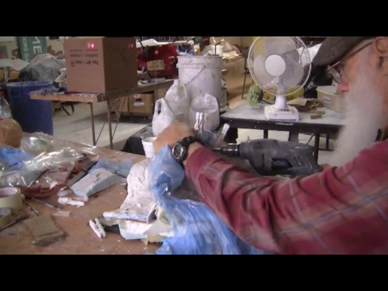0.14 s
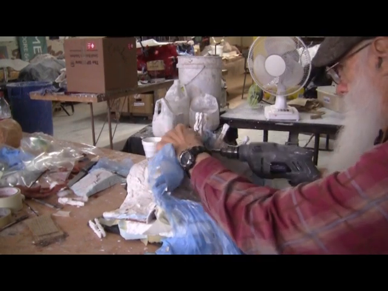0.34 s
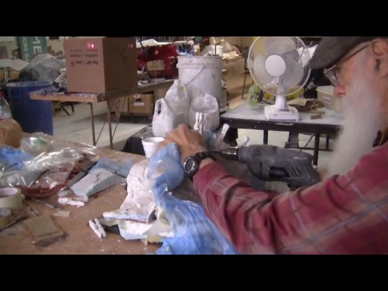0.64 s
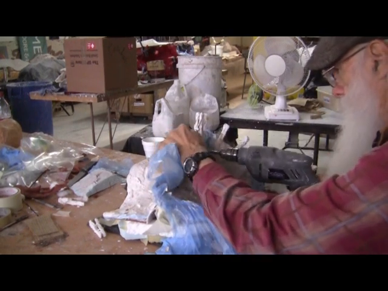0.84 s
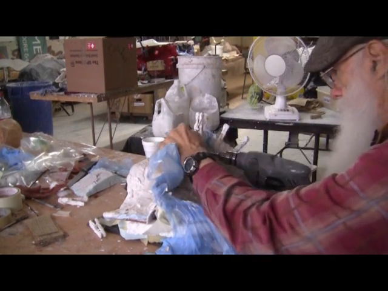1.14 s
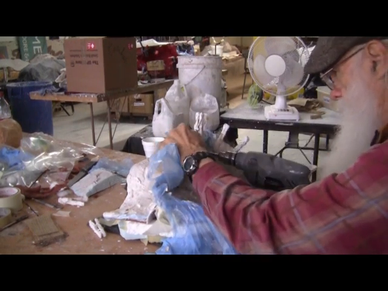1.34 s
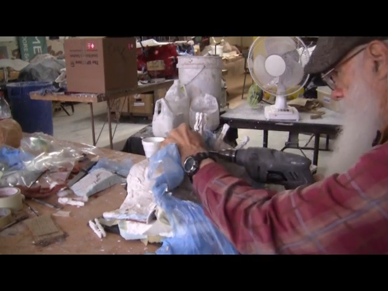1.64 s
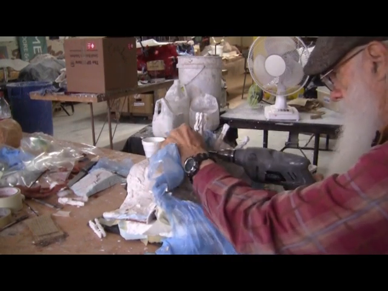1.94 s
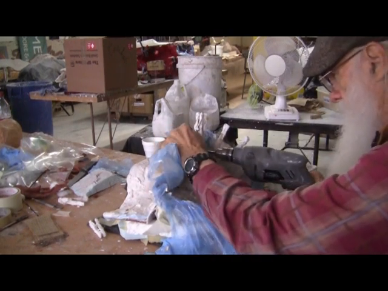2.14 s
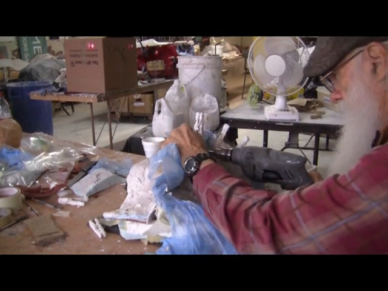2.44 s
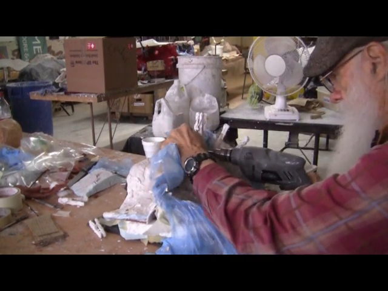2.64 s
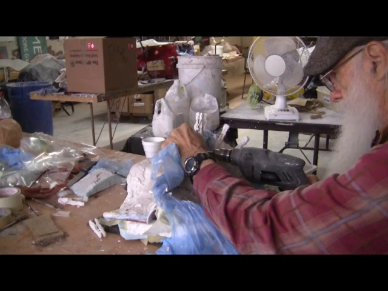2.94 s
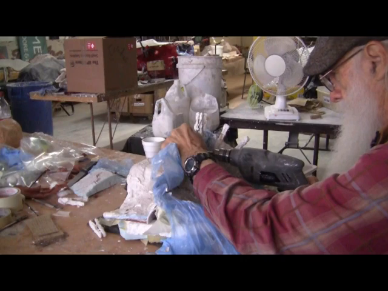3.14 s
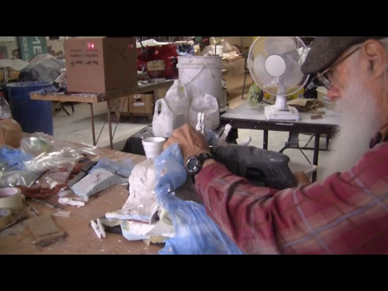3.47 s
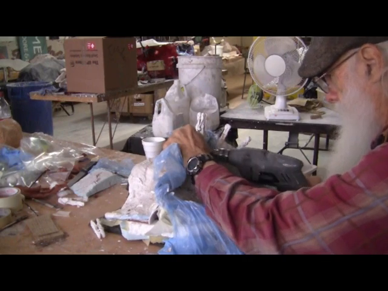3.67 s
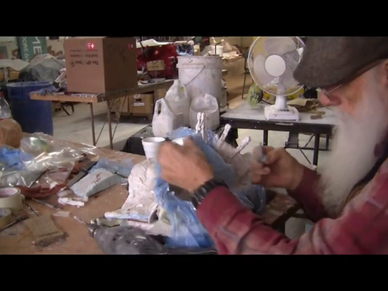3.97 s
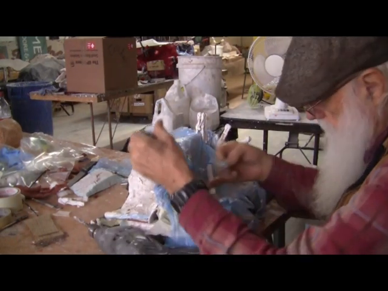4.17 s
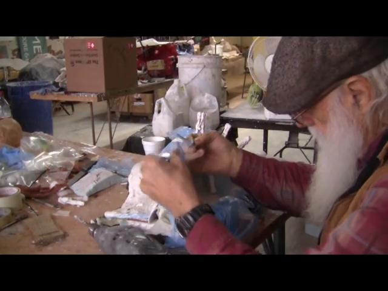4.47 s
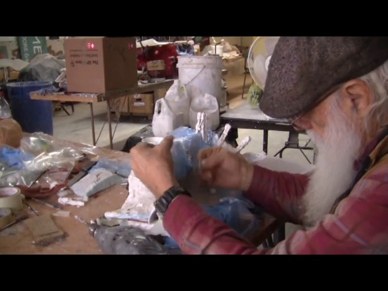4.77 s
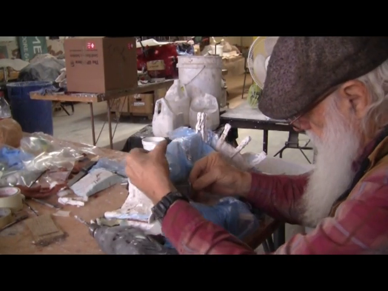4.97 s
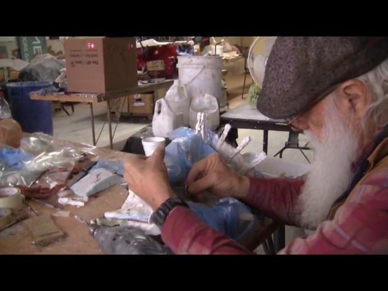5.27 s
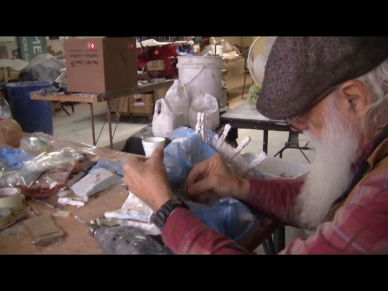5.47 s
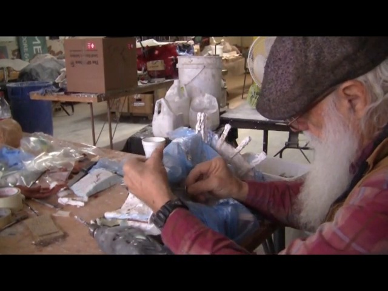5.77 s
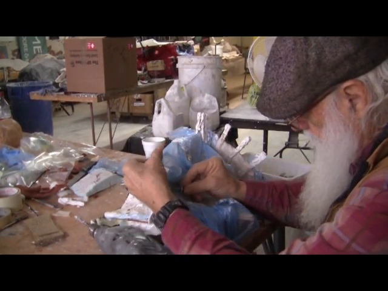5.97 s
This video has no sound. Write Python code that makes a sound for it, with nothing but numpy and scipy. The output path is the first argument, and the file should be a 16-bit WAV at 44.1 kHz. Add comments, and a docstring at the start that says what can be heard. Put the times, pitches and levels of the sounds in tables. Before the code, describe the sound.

Close plastic crinkling and small clicks surround one loud, whining, clattering run of an electric drill that stops suddenly.

```python
"""Plastic sheet and drill at a workshop bench

Close to a stereo microphone a hand rustles thin plastic; then an electric drill spins up and bores into
a mould. Its reduction gear whines and throbs once a chuck turn, the teeth clatter in the housing, the
cooling fan hisses, and a limiter holds it all down. A hard cut leads to a second scene: louder room air,
more plastic, small clicks."""
import sys
import numpy as np
from scipy import signal
from scipy.fft import rfft, irfft
from scipy.io import wavfile
from scipy.ndimage import uniform_filter1d

SR = 44100
rng = np.random.default_rng(int(sys.argv[2]) if len(sys.argv) > 2 else 0)


def digitize_waveform(pressure):
    """Quantize a signal to 16-bit integers and store it at the path in sys.argv[1].

    Rows of a 2-D input are taken as channels; values are limited to [-1, 1].
    """
    field = np.atleast_2d(pressure).T
    bounded = np.clip(field, -1, 1)
    quanta = np.round(bounded * 32767).astype(np.int16)
    wavfile.write(sys.argv[1], SR, quanta)


N = 269451
T = np.arange(N) / SR
HZ = np.fft.rfftfreq(N, 1 / SR)
TRIGGER_S, CUT_S = 1.24, 3.7745
PINION_TEETH, GEAR_TEETH, WHISTLE_ORDER = 5, 46, 35


def amp(db):
    """Decibels to gain."""
    return 10 ** (np.asarray(db) / 20)


def unit(x):
    """Scales to rms 1."""
    return x / np.sqrt(np.mean(x ** 2) + 1e-20)


def curve_at(points, hz, resonances=()):
    """Reads a curve on a log-frequency axis, plus bell-shaped resonances."""
    freqs, values = np.transpose(points)
    bells = sum(db * np.exp(-((hz - centre) / width) ** 2) for centre, width, db in resonances)
    return np.interp(np.log(hz + 1), np.log(freqs + 1), values) + bells


def colour(x, spectrum, resonances=()):
    """Causal filter with the given spectrum: a click rings after it lands."""
    hz = abs(np.fft.fftfreq(8192, 1 / SR))
    log_gain = np.log(amp(curve_at(spectrum, hz, resonances)))
    taps = np.fft.ifft(np.exp(np.conj(signal.hilbert(log_gain)))).real
    return signal.oaconvolve(x, taps[:len(taps) // 2])[:N]


def drift(rate_hz):
    """Random wander of rms 1, mostly slower than rate_hz."""
    return unit(irfft(rfft(rng.standard_normal(N)) / (1 + (HZ / rate_hz) ** 4), N))


def steady(x, size=2001):
    """Takes the slow level out of x, leaving its grain."""
    return x / np.sqrt(abs(uniform_filter1d(x ** 2, size)) + 1e-5 * np.mean(x ** 2))


# Room tone of the workshop in each scene: (frequency [Hz], relative level [dB])
FIRST_ROOM_TONE = [(20, -15), (55, -14.5), (120, -11), (215, -7.5), (350, -13), (480, -16), (1300, -21),
                   (1800, -23), (2300, -28), (3200, -28.5), (6500, -34), (9500, -40), (15500, -44)]
SECOND_ROOM_TONE = [(15, -50), (25, -32), (107, -9), (209, -7), (253, -1), (598, -8.5), (804, -11),
                    (1140, -19), (1450, -20.5), (1570, -20.5), (2420, -25.5), (3830, -37), (7500, -42.5),
                    (11200, -47), (15500, -48)]
# Ventilation resonances and one dip: (frequency [Hz], width [Hz], gain [dB])
DUCT_RESONANCES = [(55.6, 5.8, 3.5), (108, 7, 5), (252, 12, 1.5), (597, 126, -3.5), (641, 20, 6.5),
                   (825, 13, 3.5), (1436, 37, 8.5)]
# How alike the room tone is at the two microphone ports: (frequency [Hz], coherence [0..1])
ROOM_COHERENCE = [(60, 0.88), (300, 0.83), (700, 0.65), (1400, 0.74), (6000, 0.22), (15000, 0.14)]

def room_air(spectrum, db):
    """Ventilation rumbles all round the microphone, partly alike at its two ports."""
    left, independent = rfft(rng.standard_normal((2, N)))
    coherence = np.clip(curve_at(ROOM_COHERENCE, HZ), 0, 1)
    right = coherence * left + np.sqrt(1 - coherence ** 2) * independent
    rumble = irfft(np.array([left, right]) * amp(curve_at(spectrum, HZ, DUCT_RESONANCES)), N)
    flutter = amp(.7 * drift(12))
    return amp(db) * unit(rumble) * flutter


def chirr(hz=1790, pulses_per_s=23, db=-53):
    """A faint, quickly pulsing squeak somewhere in the shop."""
    pulses = np.exp(2.1 * np.cos(2 * np.pi * pulses_per_s * T + 0.48 * drift(3)))
    squeak = np.cos(2 * np.pi * hz * T + 2.2 * drift(120))
    return amp(db) * unit(pulses * squeak)


# Strokes of the hand on the plastic: (peak time [s], level [dB], rise [s], fade [s])
HAND_STROKES = [(0.055, -37.5, 0.054, 0.07), (0.19, -38, 0.1, 0.096), (0.396, -29, 0.044, 0.082),
                (0.616, -33, 0.051, 0.13), (0.94, -45, 0.046, 0.032), (1.2, -41.5, 0.066, 0.071),
                (4.013, -34, 0.015, 0.11), (4.07, -25.5, 0.0082, 0.032), (4.445, -28.5, 0.013, 0.034),
                (4.492, -31, 0.016, 0.012), (4.528, -30, 0.011, 0.041), (4.68, -36, 0.14, 0.2),
                (4.84, -40.5, 0.1, 0.058), (5.08, -45, 0.11, 0.21), (5.66, -42.5, 0.1, 0.03),
                (5.83, -43.5, 0.013, 0.011), (6.09, -45.5, 0.14, 0.07)]
# The sheet crumpled and lightly brushed: (frequency [Hz], relative level [dB])
CRUMPLE_SPECTRUM = [(100, -53), (400, -3.5), (900, 4), (1600, 0), (3000, 0), (4500, -1), (5500, -4.5),
                    (8000, -2.5), (9800, 0.5), (11300, -12), (15500, -22)]
BRUSH_SPECTRUM = [(100, -22), (500, 16), (1500, -10), (3000, 1.5), (5500, -4.5), (7500, -2), (9700, 1.5),
                  (11300, -14), (15500, -21)]

def plastic(snaps_per_s=900, spread_db=3.5, slide=0.91, resting_db=-53.5):
    """Plastic on the bench: tiny buckling snaps over a sliding hiss, swelling with each stroke."""
    power = amp(resting_db) ** 2  # the sheet never quite rests under the hand
    for peak_s, db, rise_s, fade_s in HAND_STROKES:
        stroke = np.exp(-np.maximum((peak_s - T) / rise_s, (T - peak_s) / fade_s))
        power = power + (amp(db) * stroke) ** 2
    level_db = 10 * np.log10(power)
    snaps = (rng.random(N) < snaps_per_s / SR) * rng.choice([-1, 1], N)
    sizes = amp(spread_db * np.minimum(rng.exponential(1, N), 4))
    grain = unit(steady(snaps * sizes, size=1501) + slide * rng.standard_normal(N))
    crumpled = amp(2.5) * unit(colour(grain, CRUMPLE_SPECTRUM))
    brushed = amp(-.5) * unit(colour(grain, BRUSH_SPECTRUM))
    firmness = np.clip((level_db + 50.5) / 16, 0, 1)
    drill_off = (T < TRIGGER_S) | (T > CUT_S)
    return (firmness * crumpled + (1 - firmness) * brushed) * amp(level_db) * drill_off


# Snaps of the sheet, the trigger and small parts at the bench:
# (time [s], peak level [dB], low tilt [dB], high tilt [dB], crack decay [s])
BENCH_CLICKS = [(0.153, -18, -5, -15, 0.0011), (0.191, -13, -4, -12, 0.0015),
                (0.366, -17.5, -7, -30, 0.0011), (0.396, -13.5, -17, -4, 0.00081),
                (0.671, -22, 7, -18, 0.00089), (0.761, -21, -10, -11, 0.001),
                (0.855, -27, -15, -6, 0.00085), (0.901, -26.5, -16, -19, 0.001),
                (1.176, -26, -19, -24, 0.001), (1.24, -21, -18, -1, 0.00083), (1.308, -3, -10, -30, 0.0012),
                (4.024, -18, -32, -5, 0.001), (4.354, -12.5, -15, -13.5, 0.001),
                (4.464, -16.5, -25, 5, 0.0011), (4.526, -15, -18, -6, 0.002), (4.676, -21, 3, -9, 0.00097),
                (5.459, -20.5, -7, -47, 0.001), (5.665, -24, 0, -33, 0.0011)]
# Body of a click: (frequency [Hz], relative level [dB])
CLICK_SPECTRUM = [(100, -17), (500, -5.5), (1100, 5.5), (2000, 4.5), (3300, -6), (5500, -2), (9800, 6.5),
                  (11500, -28), (16000, -37)]
# Resonances and one dip of a clicked part: (frequency [Hz], width [Hz], gain [dB])
CLICK_RESONANCES = [(1110, 140, 1), (1900, 930, -3.5), (3360, 180, 8), (4630, 250, 7)]

def clicks(ring=0.39, ring_t60_s=0.11):
    """Each click is a sharp crack and a short dead ring, tilted dull or bright."""
    out = np.zeros(N + SR)
    t = np.arange(4096) / SR
    hz = np.fft.rfftfreq(len(t), 1 / SR)
    body_db = curve_at(CLICK_SPECTRUM, hz, CLICK_RESONANCES)
    for start_s, db, low_db, high_db, crack_s in BENCH_CLICKS:
        envelope = np.exp(-t / crack_s) + ring * amp(-60 * t / ring_t60_s)
        burst = rng.standard_normal(len(t)) * envelope
        tilt_db = curve_at([(1200, low_db + 7.5), (3500, 0), (7500, high_db)], hz)
        click = irfft(rfft(burst) * amp(body_db + tilt_db - 2))
        out[round(start_s * SR):][:len(t)] += amp(db) * click / abs(click).max()
    return out[:N]


# The motor's frame: (frequency [Hz], relative level [dB])
FRAME_SPECTRUM = [(100, -20), (350, -12), (580, 0), (950, 0.5), (1400, -14.5), (3000, -6.5), (8000, -65)]

def growl(db=-22, buzz_hz=120, rise_s=0.025, fade_s=0.25):
    """The starting current shakes the frame twice a mains cycle and dies as the motor gathers speed."""
    age = np.maximum(T - TRIGGER_S, 0)
    pulses = np.exp(0.38 * np.cos(2 * np.pi * buzz_hz * age)) * rng.standard_normal(N)
    envelope = np.minimum(age / rise_s, 1) * np.exp(-age / fade_s)
    return amp(db) * envelope * steady(colour(pulses, FRAME_SPECTRUM))


# Air through the drill's vents: (frequency [Hz], relative level [dB])
VENT_SPECTRUM = [(200, -38), (1000, -2.5), (4500, -3), (5600, -5.5), (7400, -3), (8800, 3.5), (9900, 0.5),
                 (10800, -11.5), (13000, -12), (16000, -51)]

def fan(chuck):
    """Cooling air rushes through the vents."""
    return unit(colour(rng.standard_normal(N), VENT_SPECTRUM)) * np.exp(0.049 * np.cos(chuck))


# The high whistle as it climbs: (frequency [Hz], level [dB])
MOTOR_WHISTLE = [(6600, -60), (7700, -23), (8700, -19), (10000, -25), (13000, -37), (14700, -27),
                 (15400, -40.5)]

def whistle(speed, turns, waver_db=-2.0):
    """A thin, wavering high whistle that climbs at 35 times the motor's speed."""
    tone = np.cos(2 * np.pi * WHISTLE_ORDER * turns + .4 * drift(120))
    return amp(curve_at(MOTOR_WHISTLE, WHISTLE_ORDER * speed) + waver_db * drift(5.5)) * tone


# Body of the mould under the bit: (frequency [Hz], relative level [dB])
MOULD_SPECTRUM = [(50, -21), (110, -20), (270, -23.5), (470, 3.5), (750, -2), (1300, 5), (1900, -4.5),
                  (3500, -8), (6000, -17), (15000, -45)]

def boring(chuck, chips_per_s=2500, throb=0.053):
    """Chips break off under the turning bit and sound through the mould."""
    chips = (rng.random(N) < chips_per_s / SR) * rng.standard_normal(N)
    return steady(colour(chips * np.exp(throb * np.cos(chuck)), MOULD_SPECTRUM))


# The gear wheel slapping across its play: (frequency [Hz], relative level [dB])
SLAP_SPECTRUM = [(300, -34.5), (1200, -12.5), (2200, -15.5), (2900, -3.5), (3800, 1.5), (4200, -11),
                 (6000, -18), (9000, -13), (15000, -50)]
# Ring of the slapped wheel: (frequency [Hz], width [Hz], gain [dB])
WHEEL_RESONANCES = [(3470, 28, 6), (3734, 27, 4), (3840, 22, 4.5)]

def slap(chuck, strain, lag_rad=1.1, smear=0.85, chance=0.81, steps=900):
    """Once a chuck turn the gear drops into its play and chatters; strained, it grinds all the way round."""
    position = (chuck / (2 * np.pi) * steps).astype(int) % steps
    roughness = rng.standard_normal(steps)[position]  # alike on every turn
    chatter = roughness + chance * rng.standard_normal(N)
    sharpness = 2.5 * (1 - smear * strain)
    burst = np.exp(sharpness * np.cos(chuck - lag_rad))
    burst /= np.sqrt(np.i0(2 * sharpness))  # the same power at any sharpness
    return unit(colour(chatter * burst * (T > TRIGGER_S), SLAP_SPECTRUM, WHEEL_RESONANCES))


# The drill's housing, which colours clatter and whine: (frequency [Hz], relative level [dB])
HOUSING_SPECTRUM = [(60, -68), (160, -36), (280, -1), (480, -6.5), (750, -9), (1150, 5.5), (1800, -2.5),
                    (2500, -1), (4700, 6), (5500, -13), (7400, -13.5), (9500, -7.5), (11000, -11),
                    (15000, -50)]
# Its resonances and one notch: (frequency [Hz], width [Hz], gain [dB])
HOUSING_RESONANCES = [(2210, 460, 7.5), (3410, 450, 5), (3940, 36, 8), (3967, 91, -14.5), (5120, 45, 10.5),
                      (6396, 310, 13.5), (8600, 320, 4.5)]

def clatter(turns, chuck, wear=0.89, throb=0.063, lag_rad=1.0, rattle_db=2.0):
    """Teeth knock in the housing; each one's flaw returns every chuck turn, and backlash adds chance."""
    tooth = np.floor(PINION_TEETH * turns).astype(int)
    contacts = np.flatnonzero(np.diff(tooth))
    flaws = wear * unit(rng.standard_normal(GEAR_TEETH))
    knocks = np.zeros(N)
    knocks[contacts] = flaws[tooth[contacts] % GEAR_TEETH]
    backlash = rng.random(N) < np.gradient(PINION_TEETH * turns)
    knocks += backlash * rng.standard_normal(N) * amp(rattle_db * (drift(110) + 2.5))
    swell = np.exp(throb * np.cos(chuck - lag_rad))
    return steady(colour(knocks * swell, HOUSING_SPECTRUM, HOUSING_RESONANCES))


# Motor and gear-mesh partials:
# (order [x motor speed], relative level [dB], throb depth [factor], phase swing [rad])
WHINE_PARTIALS = [(1, -7, 0.15, .05), (2, -10, 0.11, 0.13), (3, -40, 0.18, 0.34), (4, -12.5, 0.14, 0.43),
                  (5, 0, 0.64, 0.77), (6, -8, 0.78, 0.25), (8, -16, 0.6, 0.85), (9, -4.5, 0.44, 2.6),
                  (10, 3, 0.67, 1.08), (11, -8.5, 0.12, 0.6), (13, -32, 0.17, .1), (14, -6.5, 0.3, .3),
                  (15, -4, 0.34, 0.8), (16, -7, 0.17, .1), (20, -1, 0.23, 1.6), (22, -3.5, 0.31, 0.44)]

def whine(speed, turns, chuck, rasp_rad=1.28, flutter_db=1.3, run_up_flutter_db=4.5):
    """Partials climb through the housing's resonances; the off-centre gear sways them once a chuck turn."""
    out = np.zeros(N)
    wobble = chuck + .14 * drift(15)
    lopsided = np.cos(wobble) - 0.4 * np.sin(2 * wobble)
    pace = speed / speed.max()
    bounce_rad = rasp_rad * np.sqrt(np.clip(1 - pace, 0, 1)) + 0.069  # teeth bounce until up to speed
    for order, db, throb, swing_rad in WHINE_PARTIALS:
        gain = amp(db + curve_at(HOUSING_SPECTRUM, order * speed, HOUSING_RESONANCES))
        if order > 10:  # the top needs speed
            gain *= pace ** 0.97
        swell = unit(np.exp(throb * pace ** 3 * lopsided))
        flutter = amp((flutter_db + run_up_flutter_db * (1 - pace)) * drift(114))
        phase = 2 * np.pi * (order * turns + rng.random())
        sway = swing_rad * np.sin(wobble) + bounce_rad * drift(150)
        out += gain * swell * flutter * np.cos(phase + sway)
    singing = np.clip((speed - 140) / 30, 0, 1)  # below 140 turns a second the gear only knocks
    return singing * out / out[(T > TRIGGER_S) & (T < CUT_S)].std()


# The load bends the motor's speed; it races as the bit breaks through: (time [s], speed gained [turns/s])
SPEED_BEND = [(1.75, -1), (2.08, 3.4), (2.22, 1.3), (2.4, 2.7), (2.7, -1), (3.05, 1.5), (3.5, -3.4),
              (3.7, 8.5), (3.77, 11)]
# How hard the bit is fed into the mould: (time [s], level [dB])
BIT_FEED = [(2.15, -12.5), (2.4, 3.5), (2.65, -3), (3.1, 4), (3.47, 1), (3.56, 7), (3.77, 9.5)]
# The bit catches while breaking through: (time [s], half length [s], whine gain [dB], scrape gain [dB])
BIT_CATCHES = [(3.515, 0.016, -7, 1), (3.642, 0.043, -10, 4.5), (3.77, 0.031, -14, 4)]
# Each layer: (base level [dB], per tenfold speed [dB], at full strain [dB], share of the feed [factor])
WHINE_LAW = (-8, 12, 7, 0.55)
CLATTER_LAW = (-17, 11, 14, 0.95)
SLAP_LAW = (-18, 7, 4.5, 0)
FAN_LAW = (-20, 34, 12, 0.97)
BIT_LAW = (-21, 14, 16.5, 1.09)

def drill(working_hz=438.5, spin_up_s=0.228, slack_db=-19, engage_s=1.285, engage_rise_s=0.042):
    """The drill, close up: one shaft spins up, and its speed, strain and feed set the layers' levels."""
    running = T > TRIGGER_S
    shortfall = np.exp(-np.maximum(T - TRIGGER_S, 0) / spin_up_s)
    bend = np.interp(T, *np.transpose(SPEED_BEND))
    speed = running * np.maximum(working_hz * (1 - shortfall) + bend, 1)  # turns a second
    speed *= 1 + .0008 * drift(14)
    turns = np.cumsum(speed) / SR
    chuck = 2 * np.pi * turns * PINION_TEETH / GEAR_TEETH + 3.9  # chuck angle in radians
    strain = np.tanh(shortfall / 0.027)  # eases within a few percent of working speed
    feed_db = np.interp(T, *np.transpose(BIT_FEED))

    controls = np.array([np.ones(N), np.log10((speed + 1) / working_hz), strain, feed_db])
    laws = np.array([WHINE_LAW, CLATTER_LAW, SLAP_LAW, FAN_LAW, BIT_LAW])
    whine_db, clatter_db, slap_db, fan_db, bit_db = laws @ controls
    for at_s, half_s, choke_db, scrape_db in BIT_CATCHES:
        catch = np.exp(-((T - at_s) / half_s) ** 2)
        whine_db += choke_db * catch
        bit_db += scrape_db * catch

    machine = amp(whine_db) * whine(speed, turns, chuck)
    machine += amp(clatter_db) * clatter(turns, chuck)
    machine += amp(slap_db) * slap(chuck, strain)
    machine += amp(fan_db) * fan(chuck) + whistle(speed, turns)
    slack = np.clip(1 - (T - engage_s) / engage_rise_s, 0, 1)  # quiet until the gears take up their play
    return running * (amp(slack_db * slack) * machine + amp(bit_db) * boring(chuck) + growl())


# Reverberation of the workshop: (frequency [Hz], time to fall 60 dB [s])
WORKSHOP_T60 = [(200, 0.95), (2000, 0.17), (10000, 0.32)]

def workshop(x, wet_db):
    """Direct sound from the bench plus a diffuse tail, different at each microphone port."""
    hz, t, noise = signal.stft(rng.standard_normal((2, SR // 2)), SR, nperseg=256)
    decay = amp(-60 * t / curve_at(WORKSHOP_T60, hz)[:, None]) * (t > .003)
    tail = signal.istft(noise * decay, SR, nperseg=256)[1]
    tail /= np.linalg.norm(tail[0])
    return x + amp(wet_db) * signal.fftconvolve(x[None], tail, axes=1)[:, :N]


def scene():
    """Two scenes at the bench, joined by a hard cut that ends the drilling."""
    handling = workshop(plastic() + clicks(), wet_db=-11.0)
    first = workshop(drill() + chirr(), wet_db=-13.5) + room_air(FIRST_ROOM_TONE, db=-42.5)
    second = room_air(SECOND_ROOM_TONE, db=-32)
    cut = np.clip((T - CUT_S) * 1000 + 1, 0, 1)  # 1 ms crossfade
    return handling + (1 - cut) * first + cut * second


def limiter(x, threshold_db=-15, slope=0.94, recovery_db_per_s=25):
    """Turns loud sound down at once and recovers slowly."""
    power_db = 10 * np.log10(abs(uniform_filter1d((x ** 2).mean(0), size=900)) + 1e-12)
    recovery_db = np.arange(x.shape[1]) / SR * recovery_db_per_s
    held_db = np.maximum.accumulate(power_db + recovery_db) - recovery_db
    over_db = np.maximum(held_db - threshold_db, 0)
    return x * amp(-slope * uniform_filter1d(over_db, size=200))


# Balance of the two microphone ports: (frequency [Hz], left minus right [dB])
PORT_BALANCE = [(100, -1.3), (200, 0.3), (380, 3.5), (700, 2.5), (1300, 1.4), (3000, 0), (8000, 1),
                (15000, -2.5)]
# Phase between the ports: (frequency [Hz], left minus right [rad])
PORT_PHASE_SHIFT = [(100, 0), (10200, -.1), (10800, -.6), (12100, -1.9), (15000, -2.1)]

def record(dry):
    """The stereo microphone: port colour, a limiter in each scene, rounded peaks, then the band limit."""
    left_gain = amp(curve_at(PORT_BALANCE, HZ) / 2) * np.exp(1j * curve_at(PORT_PHASE_SHIFT, HZ) / 2)
    ports = irfft(rfft(dry) * np.array([left_gain, 1 / left_gain]), N)
    scenes = np.split(ports, [round(CUT_S * SR)], axis=1)
    held = np.hstack([limiter(part) for part in scenes])
    rounded = held / (1 + (held / .85) ** 6) ** (1 / 6)
    lowpass = signal.firwin(511, 15850, window=("kaiser", 9), fs=SR)
    return signal.oaconvolve(rounded, lowpass[None], "same")


dry = scene()
out = record(dry)
digitize_waveform(out)
```